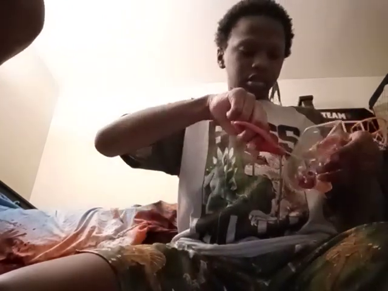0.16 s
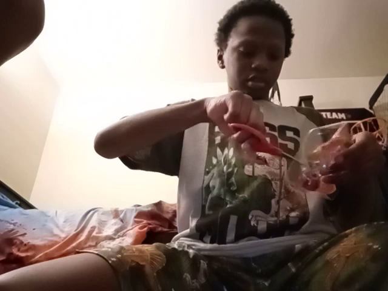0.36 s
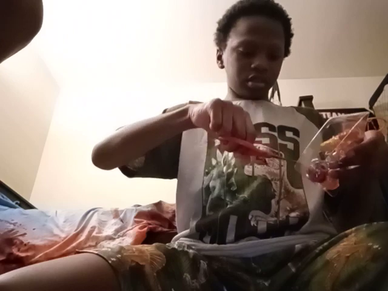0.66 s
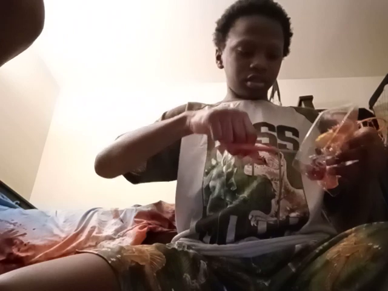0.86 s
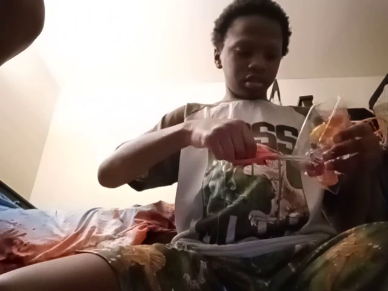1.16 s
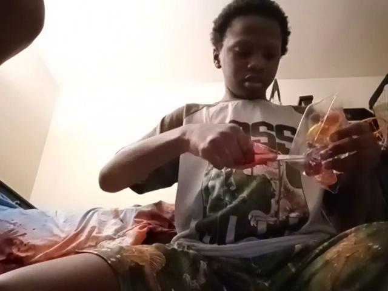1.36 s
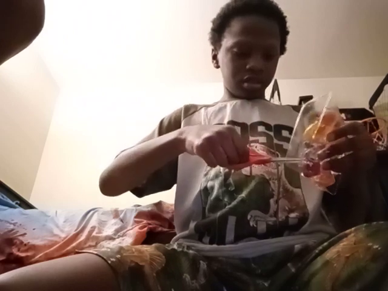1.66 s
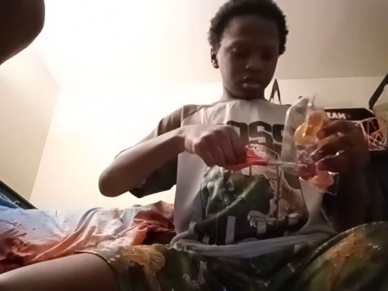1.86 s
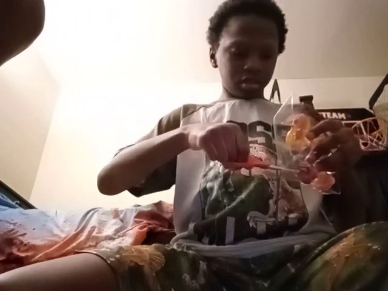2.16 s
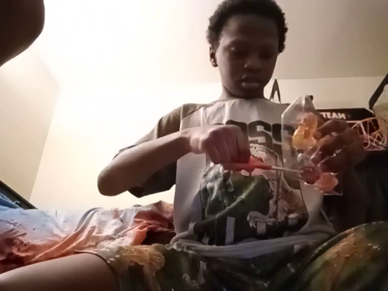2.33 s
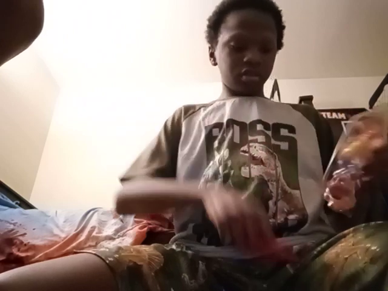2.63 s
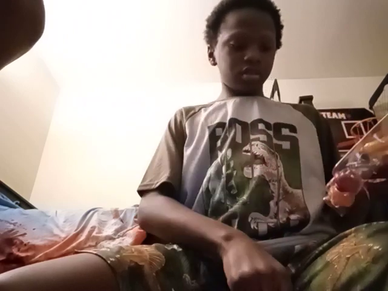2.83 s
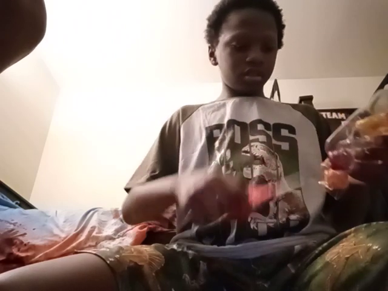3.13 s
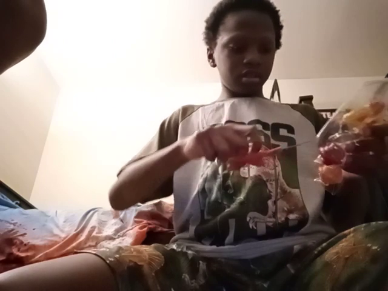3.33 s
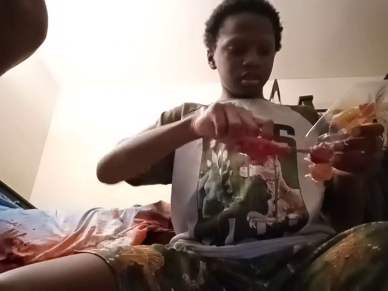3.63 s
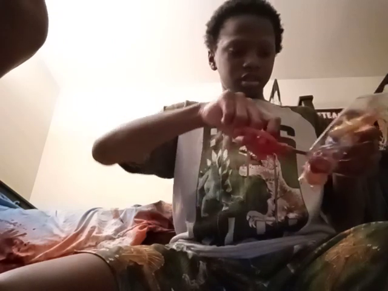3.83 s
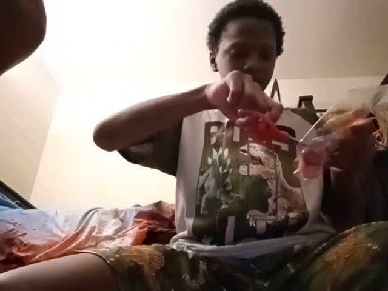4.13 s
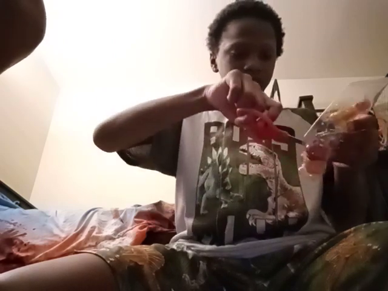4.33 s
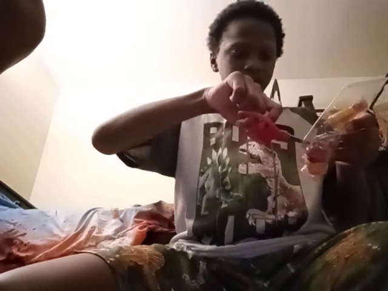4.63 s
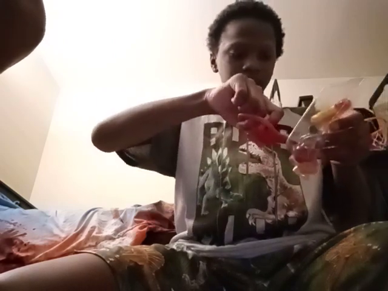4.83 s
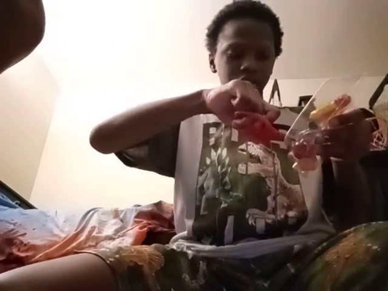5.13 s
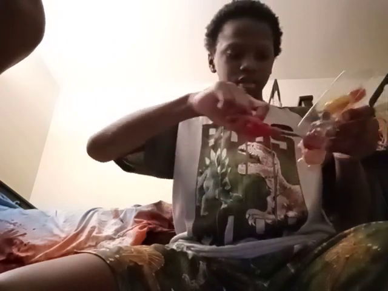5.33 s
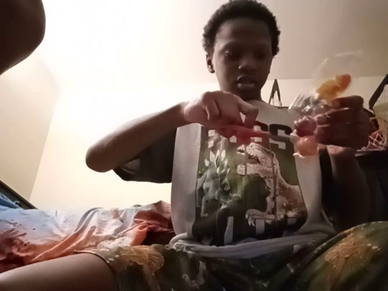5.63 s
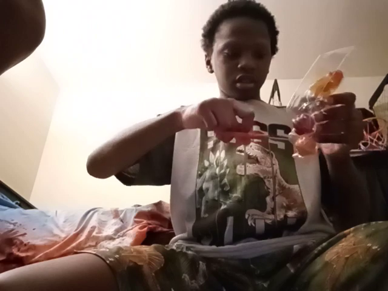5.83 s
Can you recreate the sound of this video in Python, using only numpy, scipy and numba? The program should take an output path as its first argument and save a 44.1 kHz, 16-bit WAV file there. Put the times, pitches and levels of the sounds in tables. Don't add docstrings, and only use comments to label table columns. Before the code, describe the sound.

Scissors snip through stiff clear plastic packaging close up, sharp cracks and crinkly clicks with short echoes in a small bedroom.

```python
import sys
import numpy as np
from scipy import signal
from scipy.fft import rfft, irfft
from scipy.io import wavfile
from scipy.ndimage import uniform_filter1d, map_coordinates
from numba import njit

SR = 44100
rng = np.random.default_rng(int(sys.argv[2]) if len(sys.argv) > 2 else 0)


def bounce(signal):
    frames = np.transpose(np.atleast_2d(signal))
    limited = np.clip(frames, -1, 1)
    pcm = np.round(limited * 32767).astype(np.int16)
    wavfile.write(sys.argv[1], SR, pcm)


def rack_gain(trim_db):
    fader = np.asarray(trim_db, float)
    return 10 ** (fader / 20)


N = 263915


def unit(x):
    return x / np.sqrt(np.mean(x ** 2) + 1e-20)


def smooth(grid, bands, frames):
    return uniform_filter1d(uniform_filter1d(grid, size=bands, axis=0), size=frames, axis=1)


def along(points, hz):
    point_hz, value = np.transpose(points)
    return np.interp(np.log(hz + 1), np.log(point_hz + 1), value)


def wobble(rate, near=slice(None)):
    knots = rng.standard_normal(int(N * rate / SR) + 4)
    return map_coordinates(knots, [np.arange(N)[near] * rate / SR])


def causal(points, size=2048):
    gain = rack_gain(along(points, np.fft.rfftfreq(size, 1 / SR)))
    cepstrum = irfft(np.log(gain), size)
    cepstrum[1:size // 2] *= 2
    cepstrum[size // 2 + 1:] = 0
    return irfft(np.exp(rfft(cepstrum)), size)[:size // 2]


def resonant(modes, size=1024):
    t = np.arange(size) / SR
    return sum(rack_gain(db) * np.exp(-np.pi * width * t) * np.sin(2 * np.pi * hz * t) for hz, width, db in modes)


def steep(hz, width):
    once = resonant([(hz, width, 0)])
    return np.diff(np.convolve(once, once))


def through(x, response):
    return signal.fftconvolve(x, response / np.linalg.norm(response))[:len(x)]


def add(out, s, sound):
    part = out[round(s * SR):][:len(sound)]
    part += sound[:len(part)]


def swells(rows, first_db, second_db, rise):
    t, gains = np.arange(N) / SR, rack_gain([[first_db], [second_db]]) * np.ones(N)
    for s, one_db, two_db, fall in rows:
        near = slice(max(round((s - 4 * fall) * SR), 0), round((s + 4 * fall) * SR))
        age = (t[near] - s) / fall
        shape = np.exp(-np.where(age < 0, age / rise, age) ** 2)
        gains[:, near] += rack_gain([[one_db], [two_db]]) * shape
    return gains


# frequency in Hz, level in dB per Hz.
BRIGHT_HISS = [(5000, -62.5), (5180, -20), (5350, -9.5), (5600, -18), (6400, -13), (7100, -8), (7800, -9.5),
               (8350, -11), (9250, -4), (9800, -13.5), (10300, -14), (12300, -16.5), (15800, -14)]
# frequency in Hz, level in dB per Hz.
LOW_HISS = [(180, -30), (350, -5), (550, -11), (1000, -13), (2500, -16), (3000, -19), (3430, -16),
            (3600, -4), (3800, -8), (4650, -17), (4800, -26), (5150, -26), (5250, -60)]
# frequency in Hz, width in Hz, level in dB.
WHINE_TONES = [(1900, 60, -15), (3590, 80, -3), (6750, 60, -6), (7060, 70, 0), (7300, 70, -2),
               (7800, 70, -6), (9130, 70, -6), (9330, 70, -6)]


def hiss():
    z = signal.stft(rng.standard_normal(N), nperseg=512)[2]
    patches_db = 3 * unit(smooth(rng.standard_normal(z.shape), 4, 10))
    patchy = signal.istft(z * rack_gain(patches_db), nperseg=512)[1][:N]
    low = rack_gain(-72.0) * unit(through(patchy, causal(LOW_HISS, size=8192)))
    whine = sum(rack_gain(db - 72.0) * through(rng.standard_normal(N), steep(hz, width))
                for hz, width, db in WHINE_TONES)
    bright = unit(through(rng.standard_normal(N), causal(BRIGHT_HISS, size=8192)))
    return low + whine + rack_gain(-61.5) * bright


# frequency in Hz, gain in dB.
THUMP_COLOUR = [(20, -55), (50, -5.5), (80, 6.5), (120, 15.5), (170, 4), (300, -70.5)]
# frequency in Hz, gain in dB.
CLOTH_COLOUR = [(80, -30.5), (150, 7), (250, 1), (400, -10), (700, -46), (1500, -54.5)]
# time in seconds, thump in dB, cloth in dB, fall in seconds.
BODY_SHIFTS = [(.02, -64, -75.5, 0.032), (.44, -39.5, -53, 0.07), (.62, -52, -68.5, 0.032),
               (.85, -50, -62, 0.044), (.97, -45, -60.5, 0.036), (1.19, -39.5, -44, 0.12),
               (1.41, -50, -52, 0.052), (1.59, -62, -72, 0.17), (2.36, -67.5, -58.5, 0.079),
               (2.66, -60.5, -73, 0.031), (2.92, -38, -37, 0.079), (3.17, -55, -79.5, 0.032),
               (3.63, -49.5, -54, 0.095), (3.77, -52, -51.5, 0.05), (3.95, -48, -72, 0.12),
               (5.14, -41.5, -58.5, 0.073), (5.26, -46.5, -59, 0.068), (5.635, -48.5, -46.5, 0.1)]
STILL_THUMP_DB, STILL_CLOTH_DB = -64, -71


def bed():
    thumping, rubbing = swells(BODY_SHIFTS, STILL_THUMP_DB, STILL_CLOTH_DB, rise=0.29)
    thump_noise, cloth_noise = rng.standard_normal(N), rng.standard_normal(N)
    thump = unit(rack_gain(2.3 * wobble(24)) * through(thump_noise, causal(THUMP_COLOUR, size=8192)))
    cloth = unit(rack_gain(4.7 * wobble(30)) * through(cloth_noise, causal(CLOTH_COLOUR, size=8192)))
    return rack_gain(6.0) * (thumping * thump + rubbing * cloth)


# start in seconds, end in seconds, frequency in Hz, level in dB.
PACK_CREAKS = [
    (0, .055, 1200, -50),
    (.352, .418, 1070, -27),
    (3.81, 3.93, 1180, -52),
    (4.235, 4.315, 1060, -58),
    (4.7, 4.76, 490, -60),
]
# start in seconds, end in seconds, frequency in Hz, level in dB.
BED_GROANS = [
    (3.91, 4.06, 105, -44.5),
    (5.12, 5.3, 110, -56),
    (5.62, 5.78, 72, -54),
]


def creaks():
    t, out = np.arange(N) / SR, np.zeros(N)
    for start, end, hz, db in PACK_CREAKS + BED_GROANS:
        held = np.clip(np.minimum(t - start, end - t) / .015, 0, 1)
        progress = np.clip((t - start) / (end - start), 0, 1)
        pitch_arch = 1 + .03 * (np.sin(np.pi * progress) - .7)
        unsteady_db, drift = 2.5 * wobble(50), .9 * wobble(hz / 12)
        phase = 2 * np.pi * hz * np.cumsum(pitch_arch) / SR + drift
        out += held * rack_gain(db + unsteady_db) * np.sin(phase)
    return out


# frequency in Hz, width in Hz, level in dB.
DEEP_VOICE = [(770, 50, 12.5), (1190, 220, 17)]
# frequency in Hz, width in Hz, level in dB.
MIDDLE_VOICE = [(1600, 37, 0), (2200, 85, 0.8)]
# frequency in Hz, gain in dB.
BRIGHT_VOICE = [(1000, -35), (4000, -5), (6000, -6), (8000, 1.5), (11000, -4), (16000, -16)]
# frequency in Hz, width in Hz, level in dB.
PRESENCE_VOICE = [(3120, 1200, -6), (4480, 2280, 6)]
# time in seconds, flexing in dB, scraping in dB,
# half length in seconds.
STROKES = [(0.02, -52, -54.5, 0.053), (.25, -62, -68, 0.018), (0.526, -44, -58, 0.042),
           (0.786, -65, -62, 0.017), (1.2, -56, -61.5, .12), (1.46, -45.5, -65, 0.034),
           (1.775, -88, -57, 0.035), (1.93, -62, -72, 0.05), (1.35, -64, -75, 0.02), (2.06, -70, -70, 0.29),
           (2.3, -57.5, -75, 0.03), (2.41, -76, -55.5, 0.043), (2.545, -49, -61.5, 0.041),
           (2.78, -100, -60, 0.065), (2.822, -80, -58.5, 0.0233), (3.292, -71, -64.5, 0.017),
           (3.435, -66, -64, 0.023), (3.83, -63, -56.5, 0.04), (3.99, -57, -58, 0.04),
           (4.11, -77, -58.5, 0.081), (4.252, -59, -62, 0.025), (4.39, -59, -57, 0.05),
           (4.86, -72, -86.5, 0.028), (5.35, -55, -80.5, 0.042), (5.85, -58, -64, 0.03)]
HELD_FLEX_DB, HELD_SCRAPE_DB = -95, -86


def grains():
    return rng.standard_normal(N) * rack_gain(3.5 * wobble(40) + 3 * wobble(300))


def rustle():
    flexing, scraping = swells(STROKES, HELD_FLEX_DB, HELD_SCRAPE_DB, rise=1.0)
    deep = through(grains(), resonant(DEEP_VOICE))
    middle = through(grains(), resonant(MIDDLE_VOICE))
    bright = through(grains(), causal(BRIGHT_VOICE))
    presence = through(grains(), resonant(PRESENCE_VOICE))
    flex = unit(deep + rack_gain(-5) * middle)
    scrape = unit(bright + rack_gain(-1.0) * presence)
    return flexing * flex + scraping * scrape


# frequency in Hz, decay time (t60) in seconds.
ROOM_DECAY = [(300, 0.24), (800, 0.26), (2000, 0.26), (5500, 0.3), (14600, 0.18)]


def room_tail(rise=0.0077):
    hz, t, z = signal.stft(rng.standard_normal(SR * 2 // 5), SR, nperseg=768)
    hz = hz[:, None]
    uneven_db = 2.5 * rng.standard_normal(hz.shape) * (hz < 9000) * np.clip(3000 / (hz + 1), .5, 1)
    decay_db = -60 * t / along(ROOM_DECAY, hz)
    tail = signal.istft(z * rack_gain(uneven_db + decay_db), SR, nperseg=768)[1]
    crackle_db = 2.5 * unit(uniform_filter1d(rng.standard_normal(len(tail)), size=90))
    build_up = 1 - np.exp(-np.arange(len(tail)) / SR / rise)
    tail = tail * rack_gain(crackle_db) * build_up
    return tail / np.linalg.norm(tail)


# delay in seconds, level in dB.
WALL_ECHOES = [(.0035, -10), (.0065, -11.5), (0.013, -8), (0.019, -15.5), (0.035, -9.5)]
LEAD_S = .0004


def strike(voices, t60, room_db, spike_db):
    t = np.arange(SR // 12) / SR
    near, colour = 0, np.zeros(2048)
    shape = rack_gain(-60 * t / t60) * np.clip(t / LEAD_S, 0, 1) ** 2
    for response, db in voices:
        burst = shape * rng.standard_normal(len(t))
        burst *= rack_gain(db) * np.linalg.norm(shape) / np.linalg.norm(burst)
        burst[round(LEAD_S * SR)] += rack_gain(db + spike_db)
        near = near + through(burst, response)
        colour[:len(response)] += np.linalg.norm(burst) * response / np.linalg.norm(response)
    far = signal.fftconvolve(room_tail(), colour)
    for delay, db in WALL_ECHOES:
        far[round(delay * SR):][:len(t)] += rack_gain(db - 6.0) * near
    far = rack_gain(room_db) * far
    far[:len(t)] += near
    return far


# time in seconds, frequency
# in Hz, level in dB, decay time (t60) in seconds.
PACK_RINGS = [
    (.015, 7340, -51, 0.13),
    (0.328, 1078, -24, 0.4),
    (1.722, 7880, -41.5, 0.22),
    (2.214, 8170, -56, 0.14),
    (3.944, 7200, -68, 0.24),
    (5.762, 886, -42, 0.3),
              (.0153, 7550, -34, 0.017), (.1422, 7450, -44, .015), (.3284, 7600, -25, .012),
               (1.3993, 6850, -44, 0.013), (2.758, 7250, -56, 0.02), (3.7703, 7400, -28, 0.0055),
               (3.7828, 8400, -19, 0.0091), (3.9444, 7400, -22.5, 0.011), (4.3086, 7990, -19.5, 0.0086),
               (4.236, 810, -54, .15), (3.9, 2150, -46.5, .04), (2.7, 1620, -57.5, 0.025),
               (2.275, 1120, -45, .05), (4.083, 760, -38, 0.066), (.142, 800, -39, .04),
               (0.144, 1528, -38, 0.09), (1.41, 610, -45, 0.11), (1.435, 1030, -50, 0.25),
               (1.722, 1170, -35, 0.055), (4.231, 1750, -50, .06), (2.357, 2200, -30, 0.064),
               (2.9, 960, -42, .15), (2.92, 360, -42, 0.22), (5.18, 2150, -31, .15), (5.18, 1500, -37, .15),
               (5.2, 6980, -30, 0.22),
              (2.759, 2250, -54, .05),
    (4.3095, 1130, -43, .1),
    (4.94, 1510, -56, .12),
    (4.861, 1130, -52, .05),
    (4.861, 2150, -52, .04),
]


def cup():
    t, out = np.arange(N) / SR, np.zeros(N)
    for s, hz, db, t60 in PACK_RINGS:
        near = slice(round(s * SR), round(s * SR) + SR // 2)
        age = np.maximum(t[near] - s, 0)
        unsteady_db, drift = 4 * wobble(70, near), 1.5 * wobble(60, near)
        level = rack_gain(db - 60 * age / t60 + unsteady_db)
        onset = 1 - np.exp(-age / 0.00036)
        out[near] += level * onset * np.sin(2 * np.pi * hz * age + drift)
    return out


# frequency in Hz, width in Hz, level in dB.
PACK_MODES = [(700, 34, -1), (884.6, 59, -1), (1097, 79, -6), (1150, 50, -1.5), (1264, 38, 1),
              (1500, 75, 5.5), (1663, 83, -1), (1881, 83, 0), (2150, 82, 5), (2330, 60, 0), (2488, 77, 7.5),
              (2767, 70, -1.5)]


def tones(pairs, lead_width=0.4):
    out = np.zeros(N)
    for s, db, lead_hz, second_db, second_hz, room_db in pairs:
        lead = steep(lead_hz, width=lead_width * lead_hz)
        second = steep(second_hz, width=0.54 * second_hz)
        voices = [(lead, db + 0.5), (second, db + second_db)]
        blow = strike(voices, t60=0.02, room_db=room_db, spike_db=12.5)
        lowest_hz = 0.7 * min(lead_hz, second_hz)
        small = signal.butter(N=3, Wn=lowest_hz, btype='high', fs=SR, output='sos')
        add(out, s, signal.sosfilt(small, blow))
    return out + rack_gain(-7.5) * through(out, resonant(PACK_MODES, size=2048))


# time in seconds, peak in
# dB, frequency in Hz, room in dB.
LESSER_CREASES = [(1.076, -42, 600, -1), (1.1215, -43, 850, -8), (1.1215, -43, 1520, -10),
                  (1.997, -52, 540, -2), (2.05, -44, 570, -3), (2.168, -62, 700, -10),
                  (2.214, -47, 550, -8), (2.274, -38, 1600, -10), (2.8875, -27, 2500, -22),
                  (2.8872, -19, 850, -10), (2.931, -27, 3900, -4), (2.914, -30, 850, 0),
                  (4.3086, -39, 1140, -16), (4.385, -54, 1800, -14), (4.383, -55, 1120, -12),
                  (4.4, -58, 1130, -12), (4.404, -54, 1900, -14), (4.405, -58, 330, -8),
                  (4.4525, -41, 1400, -16), (4.454, -55, 640, -4), (4.454, -40, 3300, -12),
                  (4.498, -48, 1800, -8), (5.1795, -24, 1500, -6), (5.3772, -46, 1500, -12),
                  (0.143, -44, 3500, -4), (0.005, -52, 310, 3), (1.66, -62, 650, -4), (5.765, -54, 480, -4),
                  (4.072, -41, 330, -9), (0.46, -48, 480, 0), (2.359, -33, 340, 2), (2.9205, -26, 350, 0),
                  (3.695, -42, 780, -10), (3.771, -40, 1400, -14), (3.9095, -44, 2050, -14),
                  (4.783, -43, 1180, -7), (4.79, -52, 860, 2), (4.861, -43, 2100, -10),
                  (4.939, -43, 1900, -3), (4.699, -55, 1500, -10), (5.385, -41, 2450, -2),
                  (2.272, -47, 2500, -8), (1.994, -37, 1600, -8), (5.33, -52, 680, 4), (2.79, -57, 2900, 4),
                  (2.76, -54, 3700, 3), (1.656, -53, 2150, -6), (0.97, -62, 4600, 0),
                  (0.3283, -19, 1080, -14), (0.1425, -39, 2050, -8), (1.421, -33, 1550, -8),
              (1.422, -40, 580, -4), (1.399, -42, 580, -6), (1.657, -53, 3700, 4), (1.657, -56, 1200, 0),
              (1.657, -54, 330, 2), (1.724, -42, 3600, 2), (1.995, -42, 1900, -3), (2.889, -25, 4200, 5),
              (5.181, -25, 1500, 4), (5.2, -36, 580, 4), (5.18, -27, 3900, 1), (2.385, -35, 1500, 2),
              (0.49, -47, 650, 4), (4.309, -52, 450, 4)]
OVERTONE_SHARE, OVERTONE_DB = 1.3, -14


def creases():
    pairs = [(s, db, hz, OVERTONE_DB, OVERTONE_SHARE * hz, room)
             for s, db, hz, room in LESSER_CREASES]
    return tones(pairs, lead_width=0.22)


# time in seconds, peak in dB, deep tone in Hz,
# upper tone in Hz, room in dB.
PANEL_POPS = [(0.002, -39, 1150, 900, -1), (0.13, -47.5, 1340, 1410, 3), (0.1422, -32, 870, 1500, -13),
              (0.4158, -24, 975, 1740, -5.5), (1.075, -41, 760, 1550, -3), (1.121, -33, 1170, 1970, -16),
              (1.235, -46, 730, 2100, -9), (1.371, -43, 660, 2300, -4), (1.398, -32, 1005, 1460, -2.5),
              (1.4224, -26, 1000, 2100, -11.5), (1.722, -37, 1300, 1600, -5), (1.994, -34, 870, 1250, -6),
              (2.048, -35, 950, 1700, -9), (2.212, -37, 1150, 1700, -6.5), (2.272, -35, 1150, 1600, -5),
              (2.786, -53.5, 756, 2310, -7.5), (3.695, -35.5, 824, 1870, -11.5),
              (3.77, -32, 760, 2200, -14), (3.782, -31.5, 1250, 2250, -10), (3.943, -33, 1080, 1600, -6),
              (4.0695, -28.5, 800, 1120, -11), (4.335, -40, 1115, 2430, -30), (4.938, -46, 800, 1550, -2),
              (5.763, -29.5, 883, 1610, -8)]
# time in seconds, peak in dB, deep tone in Hz, upper tone in Hz,
# room in dB.
PACK_BREAKS = [
    (2.3561, -12, 1023, 2136, -6),
    (2.8872, -8, 1000, 1430, -10),
    (2.9205, -20, 1050, 2400, -6.5),
    (5.178, -15, 780, 1700, -6),
]
# time in seconds, peak in dB, upper tone in Hz,
# room in dB.
CREASE_TICKS = [(0.207, -45.5, 1610, -5.5), (0.328, -15, 1109, -3), (0.3285, -19.5, 2150, -9),
                (4.0698, -32, 1650, -4.5), (4.0735, -34.5, 2610, -9.5), (1.4, -35.5, 2100, -3),
                (1.658, -58, 2070, 4), (2.758, -65, 2890, 3.5), (3.9095, -39.5, 1920, -14),
                (3.983, -39, 2100, -4.5), (4.195, -57, 1890, 5.5), (4.236, -48, 1700, -25),
                (4.308, -35, 2150, -8.5), (4.452, -31, 2100, -11), (4.698, -51, 2150, -6),
                (4.7836, -32.5, 1760, -13), (4.861, -36.5, 1630, -14), (5.355, -45, 1620, 1),
                (5.381, -34, 3400, -10)]
# time in seconds, peak in dB, frequency in Hz, room in dB.
PACK_THUDS = [
    (0.331, -43, 405, 7),
    (1.075, -44.5, 290, 4.5),
    (1.724, -41, 320, 3),
    (2.269, -29, 490, -4.5),
    (2.359, -41, 419, -17),
    (2.8872, -21.5, 380, 2),
    (2.918, -32, 385, 10),
    (5.181, -55, 480, 1),
]
POP_UPPER_DB, BREAK_UPPER_DB = -2.5, -3.5
TICK_UNDER, TICK_UNDER_DB = 0.76, -8.5
THUD_UNDER, THUD_UNDER_DB = 0.68, -6


def snaps():
    pairs = [(s, db, hz, POP_UPPER_DB, upper, room) for s, db, hz, upper, room in PANEL_POPS]
    pairs += [(s, db, hz, BREAK_UPPER_DB, upper, room) for s, db, hz, upper, room in PACK_BREAKS]
    pairs += [(s, db, hz, TICK_UNDER_DB, TICK_UNDER * hz, room) for s, db, hz, room in CREASE_TICKS]
    pairs += [(s, db, hz, THUD_UNDER_DB, THUD_UNDER * hz, room) for s, db, hz, room in PACK_THUDS]
    return tones(pairs)


# frequency in Hz, gain in dB.
EDGE_VOICE = [(3000, -34.5), (8000, -1.5), (11000, 4), (16000, -8)]
# time in seconds, peak in dB, edge in dB, room in dB.
BLADE_KNOCKS = [(0.142, -35, -32, 0), (1.0717, -33, -1, -6.5), (1.1206, -41, -10, -13),
                (1.1462, -26.5, 6, -11.5), (1.2334, -45.5, -22, 1), (1.3695, -38, -14, -3.5),
                (1.4192, -28.5, -10, -16.5), (1.4243, -26.5, -8.5, -3), (1.9934, -43, -24, 1.5),
                (2.0482, -41.5, -34, -5), (2.2703, -37.5, -29, -4.5), (2.7015, -54.5, -22, 0.5),
                (2.7075, -58, -25, -7), (3.6942, -38.5, -13.5, -0.5), (3.9095, -40, 1.5, -9),
                (3.984, -49.5, -14, -22.5), (4.0725, -26, -4, -2.5), (4.2694, -52, -6, 3.5),
                (4.4529, -30, 2.5, -5.5), (4.497, -49.5, -1, -7), (4.783, -34.5, -50, -2.5),
                (4.938, -32.5, -3.5, -4.5), (5.3549, -50, -10, 8), (5.382, -27.5, -10, -4),
                (5.7089, -49.5, -18, 1.5), (5.7633, -35.5, -30, -1)]
# time in seconds, peak in dB, edge in dB, room in dB.
SHEET_CRACKS = [(0.0015, -34.5, -6, 3), (0.015, -29, -13, -2), (0.1313, -35, -33.5, 1),
                (0.416, -22, -22, -7), (1.399, -17.5, -28, -10.5), (1.6562, -42.5, -9, -3.5),
                (1.7222, -19, -22.5, -7.5), (2.2147, -26.5, -19.5, -6.5), (2.7265, -45, -8, -0.5),
                (2.7583, -37, -12.5, -4), (2.7864, -35.5, 0, -10), (3.771, -26.5, 2, -13.5),
                (3.7826, -17, -0.5, -15), (3.7953, -28.5, -7, 5.5), (3.929, -47.5, -1, -24),
                (3.9453, -13.5, -9.5, -7), (4.2394, -45, 8, -1.5), (4.308, -21.5, -2, -7),
                (4.3333, -32.5, -16.5, -4.5), (4.384, -35, -1, -9), (4.4014, -33, 2.5, -5.5),
                (4.699, -43.5, 1, -7), (4.7332, -39.5, -26.5, -6.5), (4.8612, -27.5, 6, -4),
                (5.5662, -43.5, -12, -7)]
# time in seconds, peak in dB, presence in dB, # edge in dB, room in dB.
CUTS_AND_CRACKS = [(0.3255, -16, -6, -13.5, 6), (0.3279, -5, -29, -4.5, -7), (2.3569, -13.5, -17, -25, -10.5),
                   (2.3602, -4, -6, -6.5, -1.5), (2.887, -4.5, -8.5, -8, -5.5), (2.9205, -19, -5.5, 1, 2.5),
                   (3.1265, -24, -45, -29, -12.5), (4.4599, -33.5, -10, -10.5, -22), (5.176, -12, -10.5, -11, 1),
                   (5.1785, -1, -13, -10, -2), (5.2022, -14.5, -5.5, -19, 5.5)]
KNOCK_PRESENCE_DB, CRACK_PRESENCE_DB = -3.5, -16


def clicks():
    presence, bright, edge = resonant(PRESENCE_VOICE), causal(BRIGHT_VOICE), causal(EDGE_VOICE)
    out = np.zeros(N)
    knocks = [(s, db, KNOCK_PRESENCE_DB, edge_db, room) for s, db, edge_db, room in BLADE_KNOCKS]
    cracks = [(s, db, CRACK_PRESENCE_DB, edge_db, room) for s, db, edge_db, room in SHEET_CRACKS]
    for s, db, presence_db, edge_db, room_db in knocks + cracks + CUTS_AND_CRACKS:
        voices = [(presence, db + presence_db - 3.0), (bright, db - 11.0), (edge, db + edge_db - 7)]
        add(out, s, strike(voices, t60=0.03, room_db=room_db, spike_db=16.0))
    return out + rack_gain(-22) * through(out, resonant(PACK_MODES, size=2048))


def scene():
    background = bed() + creaks() + rustle()
    pack = cup() + creases() + snaps() + clicks()
    return (background + pack)[None]


# frequency in Hz, gain in dB.
CASE_COLOUR = [(25, -23.5), (60, -6), (100, -16), (2500, 0), (2900, -0.5), (3700, 7.5), (4500, 2),
               (5300, -5.5), (6200, 4), (7200, 7), (8300, 3.5), (9300, 2.5), (11000, -3), (15000, 5)]


def case(x):
    return signal.fftconvolve(x, causal(CASE_COLOUR, size=8192))[:N]


def reduce_noise(x, start_db=-88, slope=15.0, depth_db=18, low_hz=450, high_hz=5200):
    hz, _, z = signal.stft(x, SR, nperseg=512)
    power = smooth(np.abs(z) ** 2, 5, 4)
    level_db = 10 * np.log10(np.abs(power) + 1e-16)
    cut_db = smooth(np.clip(slope * (level_db - start_db), -depth_db, 0), 5, 3)
    inside = (hz > low_hz) & (hz < high_hz)
    return signal.istft(z * rack_gain(cut_db * inside[:, None]), SR, nperseg=512)[1][:N]


@njit
def follow(over, attack, release):
    out, now = np.empty_like(over), 0.
    for i in range(len(over)):
        now += (over[i] - now) * (attack if over[i] > now else release)
        out[i] = now
    return out


def duck(x, start_db=-34, share=0.47, attack=0.0039, release=0.038):
    level_db = 10 * np.log10(np.abs(uniform_filter1d(x ** 2, size=96)) + 1e-12)
    over = share * np.maximum(level_db - start_db, 0)
    return x * rack_gain(-follow(over, 1 / (attack * SR), 1 / (release * SR)))


def band_limit(x, top_hz=15900, end_hz=17000):
    hz, spectrum = np.fft.rfftfreq(N, 1 / SR), rfft(x)
    lower = irfft(spectrum * (hz < top_hz), N)
    upper = irfft(spectrum * (hz > top_hz) * (hz < end_hz), N)
    sudden = uniform_filter1d(upper ** 2, size=128) > 5 * uniform_filter1d(upper ** 2, size=4096)
    return lower + rack_gain(-23.0) * uniform_filter1d(sudden * 1., size=128) * upper


def roll_off(x):
    return signal.sosfilt(signal.butter(12, 17060, fs=SR, output="sos"), x)


def record(dry):
    heard = reduce_noise(case(dry[0]))
    levelled = duck(heard + hiss())
    mix = band_limit(levelled)[None]
    return roll_off(mix)


dry = scene()
out = record(dry)
bounce(out)
```